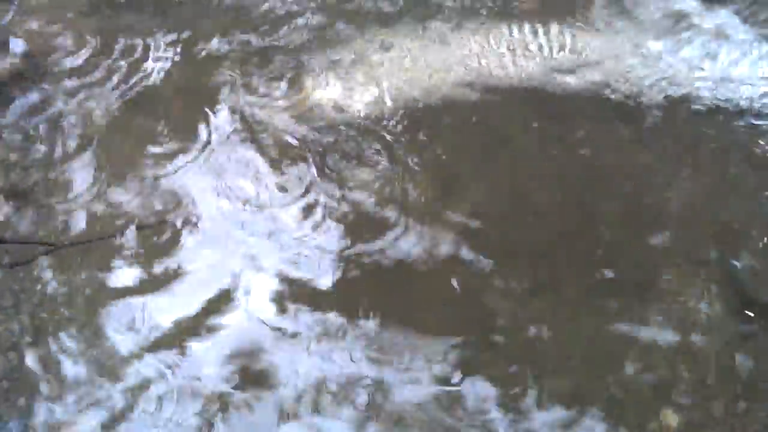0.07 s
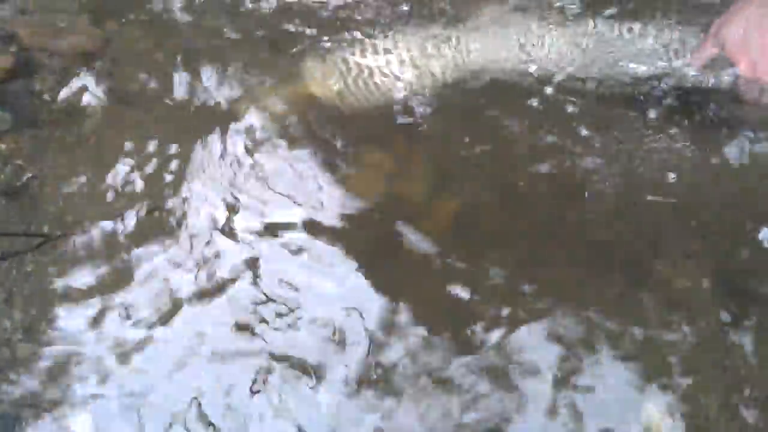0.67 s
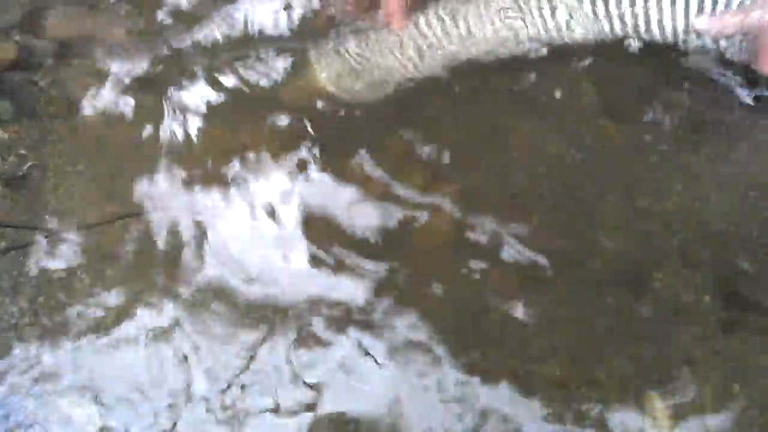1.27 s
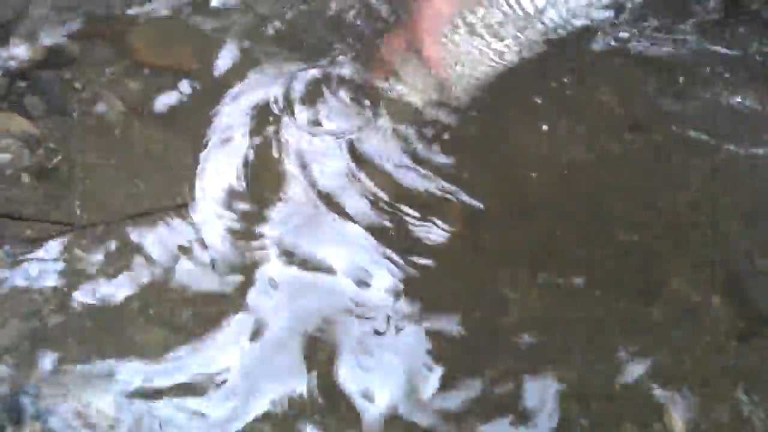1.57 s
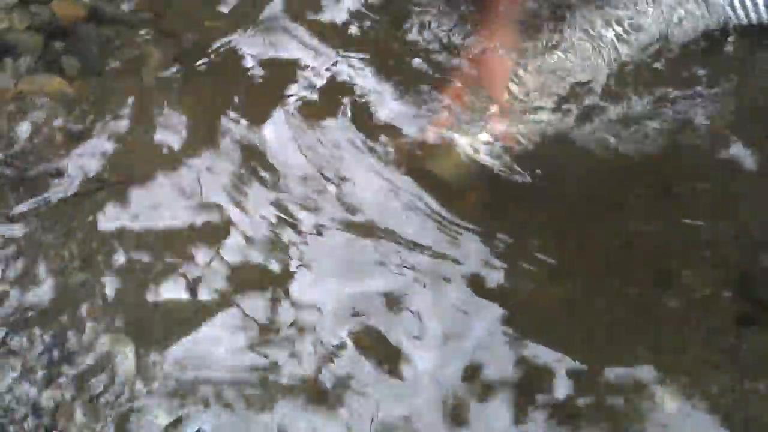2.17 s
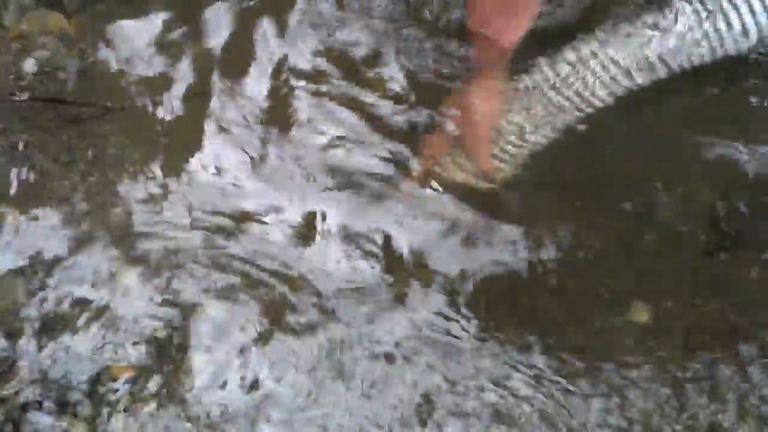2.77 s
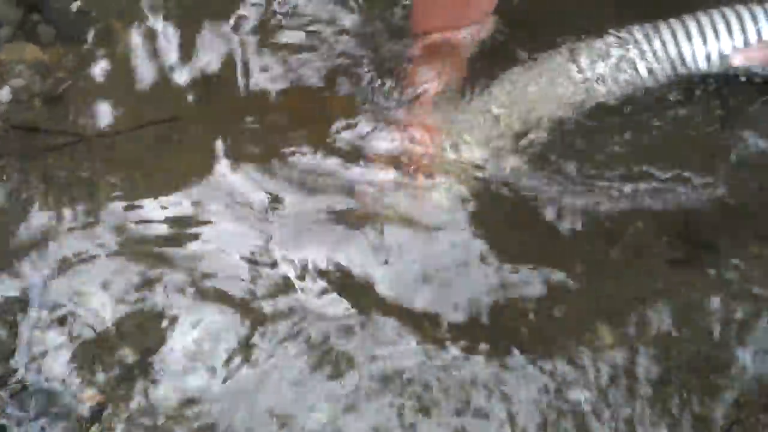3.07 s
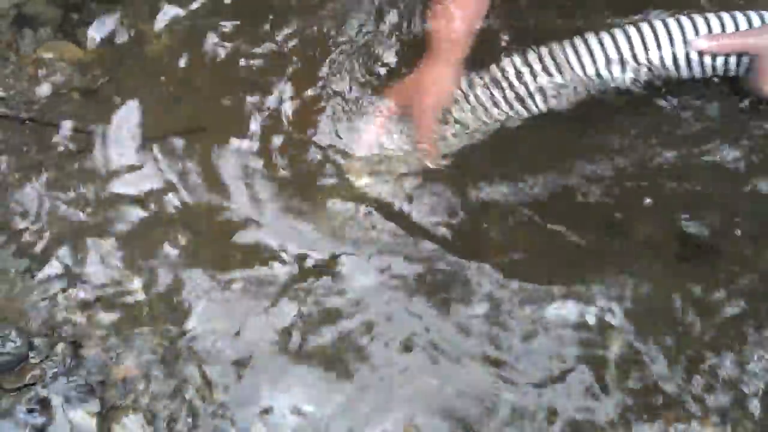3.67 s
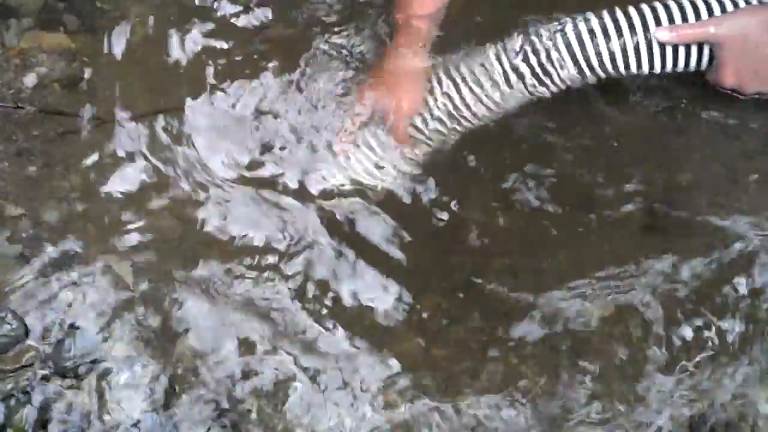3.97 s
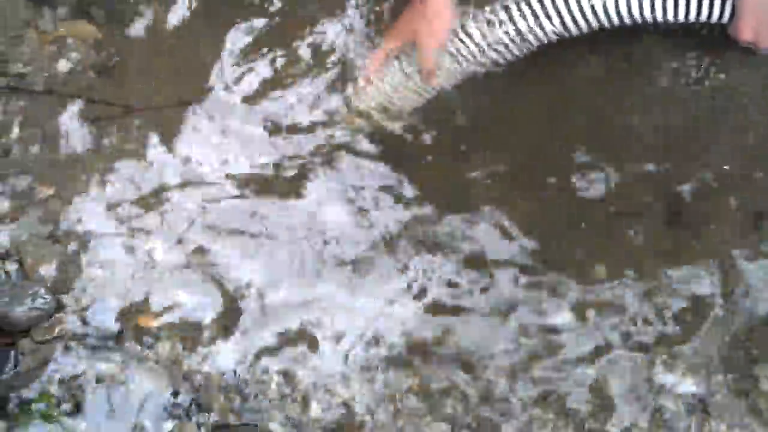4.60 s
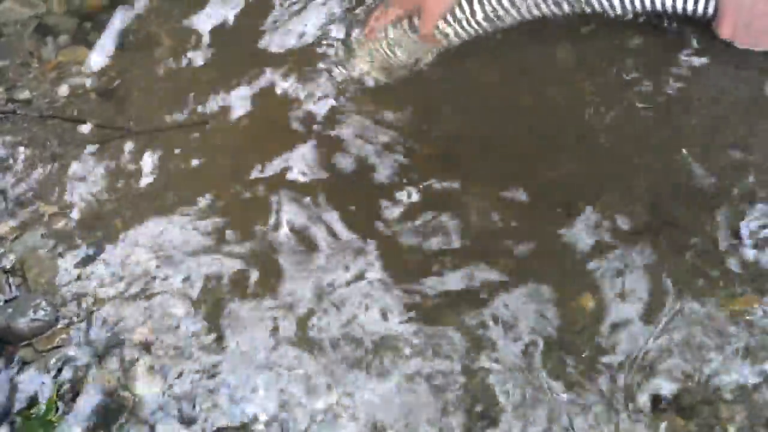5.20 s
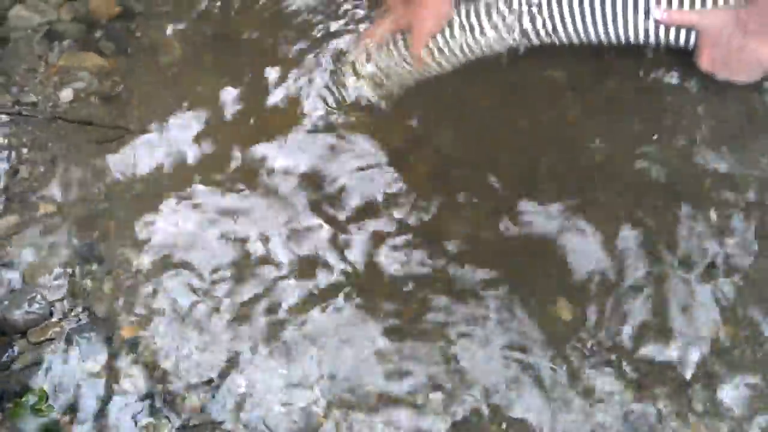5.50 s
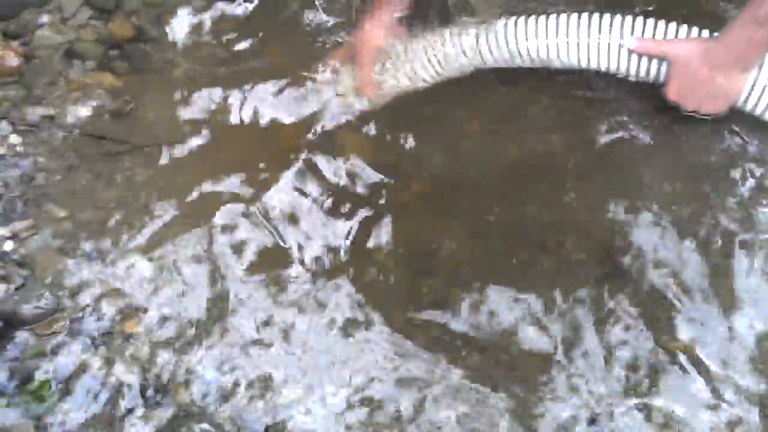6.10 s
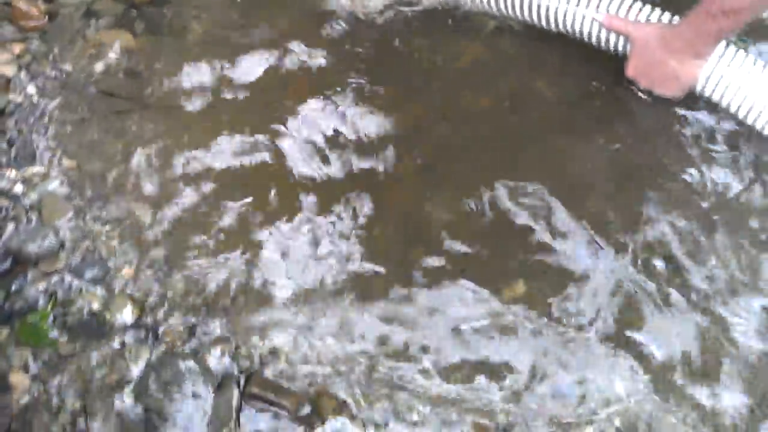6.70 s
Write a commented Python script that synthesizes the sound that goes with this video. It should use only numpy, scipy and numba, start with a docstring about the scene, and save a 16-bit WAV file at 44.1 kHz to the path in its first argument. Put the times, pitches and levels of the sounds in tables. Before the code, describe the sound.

A small engine drones steadily beside a babbling creek, while a suction hose in the shallows gulps, plops and splashes.

```python
"""A small dredge engine drones on a creek bank: its periodic firing gives a harmonic series over a
throbbing clatter. The creek babbles and fizzes by the resonance of countless air bubbles. A suction hose
worked through the shallows gulps air, plops, splashes and spits, and its nozzle knocks on the bed.
A widened stereo microphone drifts between two spots and ducks its gain after the loud moments."""
import sys
import numpy as np
from scipy import signal
from scipy.fft import rfft, irfft, next_fast_len
from scipy.io import wavfile
from scipy.ndimage import uniform_filter1d, map_coordinates
from numba import njit

SR = 44100
rng = np.random.default_rng(int(sys.argv[2]) if len(sys.argv) > 2 else 0)


def wrap_up_sound(samples):
    """Save the sound to the file named by the first command line argument, as 16-bit audio."""
    columns = np.atleast_2d(samples).T
    # keep every value between -1 and 1, then stretch to whole-number steps
    tamed = np.clip(columns, -1, 1)
    steps = np.round(tamed * 32767).astype(np.int16)
    wavfile.write(sys.argv[1], SR, steps)


N = 302085
TIME = np.arange(N) / SR


def amp(db):
    """Amplitude ratio of a level in decibels."""
    return 10 ** (np.asarray(db) / 20)


def unit(x):
    """Normalisation to rms 1."""
    return x / np.sqrt(np.mean(x ** 2) + 1e-20)


def along(points, hz):
    """Interpolation of (Hz, value) points on a logarithmic frequency axis."""
    freqs, values = np.transpose(points)
    return np.interp(np.log(hz + 1), np.log(freqs + 1), values)


def wobble(rate):
    """Slow random modulation: a spline through rate knots a second."""
    knots = rng.standard_normal(int(N * rate / SR) + 4)
    return map_coordinates(knots, [TIME * rate], mode="nearest")


def filtered(x, response):
    """Linear filtering: the spectrum is multiplied by a frequency response."""
    size = next_fast_len(N + 8192)
    return irfft(rfft(x, size) * response(np.fft.rfftfreq(size, 1 / SR)), size)[..., :N]


def passed(x, kind, hz):
    """Second-order filtering with a flat passband."""
    return signal.sosfilt(signal.butter(2, hz, kind, fs=SR, output="sos"), x)


def add(track, start_s, sound):
    """Superposition of a short sound on a track."""
    part = track[..., round(start_s * SR):][..., :sound.shape[-1]]
    part += sound[..., :part.shape[-1]]


def drift(start_s=1.9, end_s=6.3):
    """Accelerating motion: the microphone's share of the way from the first spot to the second."""
    return np.clip((TIME - start_s) / (end_s - start_s), 0, 1) ** 2.4


# Each row: frequency in Hz, correlation of the two microphone ports.
COHERENCE = [(60, 0.7), (150, 0.84), (400, 0.88), (800, 0.65), (1400, 0), (2200, 0.16), (5000, 0.068),
             (12000, 0)]

def at_ports(pair, spectrum):
    """Spatial coherence: two close ports hear long waves alike, short ones independently; rms 1."""
    def response(hz):
        angle = np.arccos(np.clip(along(COHERENCE, hz), -1, 1)) / 2
        return amp(along(spectrum, hz)) * [np.cos(angle), np.sin(angle)]
    mid, side = filtered(pair, response)
    return unit(np.array([mid + side, mid - side]))


def rumble(level_db=-75, lumps_db=4.5):
    """Antiphase noise: a faint, uneven rumble, opposite in the two channels."""
    low = unit(filtered(rng.standard_normal(N), lambda hz: 1 / (1 + (hz / 90) ** 4)))
    return amp(level_db + lumps_db * wobble(9)) * low * np.array([[1], [-1]])


def bubble(t, hz, t60, swell_s, rise=0.068):
    """Bubble resonance: trapped air rings, its pitch rising by the share rise per t60 as it surfaces."""
    envelope = amp(-60 * t / t60) * (1 - np.exp(-t / swell_s))
    return envelope * np.sin(2 * np.pi * hz * t * (1 + rise * t / t60 / 2))


def swarm(low_hz, high_hz, cycles, spread_db, count, samples):
    """Incoherent summation: bubbles ring at random moments in two independent streams; rms 1."""
    when, pitch, strength, stream = rng.random((count, 4)).T[..., None]
    hz = low_hz * (high_hz / low_hz) ** pitch
    gain = amp(-spread_db * np.log(1 - .98 * strength)) * np.sqrt(hz)
    rings = gain * bubble(np.arange(samples) / SR, hz, t60=cycles / hz, swell_s=.5 / hz, rise=0.17)
    place = (when * (N - samples)).astype(int) + np.arange(samples) + N * (stream > .5)
    return unit(np.bincount(place.ravel(), rings.ravel(), 2 * N).reshape(2, N))


def patchy_noise(depth_db):
    """Random modulation in time and frequency: two white noises share patches of gain."""
    spectra = signal.stft(rng.standard_normal((2, N)), nperseg=512)[2]
    patches = rng.standard_normal(spectra.shape[1:])
    for axis in (0, 1):
        patches = uniform_filter1d(patches, size=7, axis=axis)
    return unit(signal.istft(spectra * amp(depth_db * unit(patches)), nperseg=512)[1][:, :N])


# Spectra of large and of tiny bubbles. Each row: frequency in Hz, relative density in dB.
BABBLE_SPECTRUM = [(100, -14.5), (350, 5), (590, 3), (700, 1.5), (1000, 0), (1400, -2.5), (2000, -6),
                   (2700, -12.5), (5000, -24.5), (12000, -59)]
FIZZ_SPECTRUM = [(500, -7), (1500, -1.5), (2300, 7), (3300, 2.5), (4300, 2), (6500, 0.5), (8000, -1),
                 (10000, -6), (13000, -15), (15500, -19)]
# A hand stirs the shallows. Each row: time of the peak in seconds, swell of the babble in dB.
STIRS = [(.7, 1), (1.55, 2.5), (2.84, 3.8), (3.1, 1), (3.33, 3), (3.62, 2), (4.25, 1), (5.4, 1.5)]

def creek(babble_db=-34.5, fizz_db=-38.5, stir_s=0.1):
    """Resonance falls with size: large bubbles babble, tiny ones fizz, louder as the microphone nears."""
    nearness = drift()
    stir_db = sum(db * np.exp(-((TIME - peak) / stir_s) ** 2) for peak, db in STIRS)
    surge_db = -0.24 * wobble(5.2)
    large = swarm(649, 2440, cycles=14, spread_db=4, count=1800, samples=1000)
    tiny = swarm(2260, 13400, cycles=18, spread_db=2.5, count=9000, samples=200)
    babble = at_ports(patchy_noise(depth_db=1.47) + 0.11 * large, BABBLE_SPECTRUM)
    fizz = at_ports(patchy_noise(depth_db=1.4) + 0.24 * tiny, FIZZ_SPECTRUM)
    babble *= amp(babble_db + 2 * nearness + stir_db + surge_db)
    fizz *= amp(fizz_db + 0.45 * nearness + 0.07 * stir_db + surge_db + 0.5 * wobble(12))
    return babble + fizz


# Low glugs and high plinks. Each row: start in seconds, level in dB, pitch in Hz.
BUBBLES = [(.7235, -17, 345), (.769, -21, 438), (.804, -17, 437), (4.491, -14, 315), (4.511, -17, 323),
           (4.535, -17, 530), (4.566, -27, 900), (1.191, -21, 2060), (1.193, -29, 3960), (1.558, -23, 1200),
           (1.57, -24, 1800), (1.584, -24, 1360), (1.703, -18.5, 2940), (2.249, -20.5, 3850),
           (2.53, -16, 2110), (2.8884, -15.5, 2030), (3.144, -25, 1520), (3.203, -21, 2020),
           (3.7295, -21, 1000), (4.974, -25, 2130), (5.441, -23, 1300), (6.064, -26, 1490)]

def single_bubbles(t, t60_at_1khz=0.025):
    """Damping grows with frequency: the smaller a bubble, the sooner its ring dies."""
    track = np.zeros(N)
    for start, db, hz in BUBBLES:
        t60 = t60_at_1khz * (hz / 1000) ** -0.35
        add(track, start, amp(db) * bubble(t, hz, t60, swell_s=1 / hz))
    return track


# Spits of spray, and at 4.528 s the click of the nozzle striking the bed. Each row: start in seconds, level in
# dB, length in seconds.
SPITS = [(1.207, -31, 0.0085), (1.53, -38, 0.079), (2.067, -28, 0.01), (2.083, -22, 0.047),
         (2.12, -19, 0.0083), (2.822, -31, 0.0049), (3.173, -34, 0.005), (3.437, -30.5, 0.0056),
         (3.73, -37, 0.0031), (4.44, -41, 0.05), (4.528, -33, 0.0038), (5.14, -32, 0.0034),
         (5.486, -35, 0.021), (5.746, -28.5, 0.0051), (5.773, -32, 0.0096), (5.92, -53, 0.06),
         (6.255, -30, 0.0068), (6.727, -34, 0.041)]
# Spectrum of the droplets. Each row: frequency in Hz, relative density in dB.
DROPLET_SPECTRUM = [(500, -10), (2000, 3), (4000, 2.5), (8000, 2.5), (12000, -10.5), (15500, -14)]

def spray(t, fleck_count=14, attack_s=0.00076):
    """Brief bursts are broadband: spits, a tick as each single bubble is trapped, faint random flecks."""
    ticks = [(start, db - 14.5, 0.0022) for start, db, _ in BUBBLES]
    flecks = [(when * N / SR, -41 + 6 * strength, 0.006)
              for when, strength in rng.random((fleck_count, 2))]
    envelope = np.zeros(N)
    for start, db, length in [*SPITS, *ticks, *flecks]:
        add(envelope, start, amp(db) * (1 - np.exp(-t / attack_s)) * np.exp(-(t / length) ** 2))
    return envelope * at_ports(rng.laplace(size=(2, N)), DROPLET_SPECTRUM)


# Splashes round hand and hose. Each row: start in seconds, level in dB, length in seconds, pitch in Hz.
SPLASHES = [(0.248, -30, 0.007, 845), (1.193, -31.5, 0.0096, 4000), (1.207, -35, 0.0056, 4600),
            (1.54, -32, 0.0059, 4300), (2.25, -38, 0.0073, 4370), (2.699, -34, 0.0085, 1890),
            (2.786, -34.5, 0.0046, 1690), (2.891, -28, 0.0046, 1680), (2.977, -34, 0.0048, 1700),
            (3.174, -28, 0.0043, 1710), (3.203, -44, 0.0061, 1400), (3.729, -31, 0.0041, 1890),
            (5.066, -29, 0.00513, 1400), (5.336, -34, 0.026, 937), (5.487, -33, 0.0032, 4600),
            (6.088, -33.5, 0.013, 1500), (6.62, -31.5, 0.0094, 990), (6.685, -31.5, 0.007, 1800)]

def splashes(t, count=14, scatter_octaves=0.55, cycles=9.4):
    """Air entrainment: each wavelet breaks into a cluster of short-lived bubbles, densest at first."""
    track = np.zeros(N)
    for start, db, length, middle_hz in SPLASHES:
        when, strength = rng.random((2, count, 1))
        hz = middle_hz * 2 ** (scatter_octaves * np.clip(rng.standard_normal((count, 1)), -2, 2))
        age = np.maximum(t - length * when ** 2, 0)
        rings = bubble(age, hz, t60=cycles / hz, swell_s=.2 / hz)
        cluster = np.sum(strength * np.sqrt(hz) * rings, axis=0)
        rms = np.sqrt(np.sum(cluster ** 2) / (length * SR))
        add(track, start, amp(db) * cluster / rms)
    return track


def gulp(t, start_s=0.7108, peak_db=-19.5, from_hz=915, octaves_per_s=26, swell_s=0.01, t60=0.038):
    """A gliding resonance: air gulped by the nozzle swells, shoots up an octave and breaks off."""
    hz = from_hz * 2 ** np.minimum(octaves_per_s * t, 1)
    shape_db = np.minimum(10 * (t / swell_s - 1), -60 * (t - swell_s) / t60)
    track = np.zeros(N)
    add(track, start_s, amp(peak_db + shape_db) * np.sin(2 * np.pi * np.cumsum(hz) / SR))
    return track


# Rings of the cavity. Each row: delay in seconds, level in dB, pitch in Hz, t60 in seconds.
CAVITY_RINGS = [(0, -1.5, 830, .0065), (0.0021, -4.5, 935, 0.019), (0.0001, -13, 1300, 0.01),
                (0, -14, 720, 0.018), (0.0021, -23, 1750, 0.012), (0.0105, -17, 950, 0.015)]

def plop(t, start_s=2.0797):
    """Cavity collapse: the hose mouth slaps the surface, and the hollow rings as it closes."""
    track = np.zeros(N)
    for delay, db, hz, t60 in CAVITY_RINGS:
        add(track, start_s + delay, amp(db) * bubble(t, hz, t60, swell_s=0.00026, rise=0.02))
    return track


# Modes of the nozzle. Each row: frequency in Hz, level in dB, t60 in seconds.
NOZZLE_MODES = [(322.5, -10.5, 0.098), (533, -17.5, 0.18), (700, -13.5, 0.042), (966, -28, 0.067),
                (1100, -26, 0.037), (1630, -26, 0.038)]
# The two contacts of one knock. Each row: start in seconds, gain in dB.
CONTACTS = [(4.497, -10), (4.528, -0.5)]

def knock(t, gravel_db=-24, gravel_t60=0.14):
    """Impact excites damped modes: the nozzle strikes the bed, and shifting gravel adds a dull tail."""
    modes = sum(amp(db - 60 * t / t60) * np.sin(2 * np.pi * hz * t) for hz, db, t60 in NOZZLE_MODES)
    track = np.zeros(N)
    for start, db in CONTACTS:
        gravel = unit(passed(rng.standard_normal(len(t)), "band", [250, 900]))
        add(track, start, amp(db) * (amp(gravel_db - 60 * t / gravel_t60) * gravel - modes))
    return track


def hose(left_db=-2):
    """Small sources radiate little bass: the rings round the hose lose their lows; spray lies on top."""
    t = np.arange(SR // 4) / SR  # time within one event
    rings = single_bubbles(t) + splashes(t) + gulp(t) + plop(t) + knock(t)
    return passed(rings, "high", 220) * amp([[left_db], [0]]) + spray(t)


# Spectrum of engine and pump noise. Each row: frequency in Hz, relative density in dB.
CLATTER_SPECTRUM = [(20, -20), (60, -20), (110, -8), (240, -6), (335, 9.5), (420, 0), (510, 9.5), (590, -9),
                    (665, -1), (780, -9.5), (880, -4), (1300, -33), (2100, -12), (3000, -14), (8000, -48)]
# Its change of colour at the second spot. Each row: frequency in Hz, gain in dB.
SECOND_SPOT_COLOUR = [(180, -1), (260, 5.5), (350, -6), (500, -6), (660, 6), (1200, -4), (2200, -10)]

def clatter(firings, level_db=-37, throb_depth=0.25, buzz_above_hz=600):
    """Amplitude modulation: engine and pump noise throbs three times a firing; part of it repeats."""
    period = round(SR / 28.385)  # samples in a mean firing cycle
    repeating = rng.standard_normal((2, period))[:, (firings % 1 * period).astype(int) % period]
    buzz = filtered(repeating, lambda hz: hz > buzz_above_hz)
    throb = 1 + throb_depth * np.cos(2 * np.pi * 3 * firings)
    first = at_ports(throb * (rng.standard_normal((2, N)) + 0.44 * buzz), CLATTER_SPECTRUM)
    second = filtered(first, lambda hz: amp(along(SECOND_SPOT_COLOUR, hz)))
    onward = drift()
    return amp(level_db) * ((1 - onward) * first + onward * second)


# Exhaust tones. Each row: multiple of the firing rate, then for each of the two spots
# left level in dB, right level in dB, phase lead of the left in radians.
HARMONICS = [(2, -48, -47, 3.1, -48, -48, 3.1), (3, -52, -54, -3.0, -53, -55, -3.0),
             (4, -53, -62, -1.8, -52, -62, -2.0), (5, -32, -36, -0.8, -28, -34, -1.3),
             (6, -39, -40, -0.8, -36, -38, -1.5), (7, -53, -50, -1.5, -53, -47, -2.2),
             (8, -43, -35, -1.7, -42, -38, -2.0), (9, -38, -33, 3.3, -31.5, -35.5, 1.0),
             (10, -63, -44, 0.4, -54, -49, -0.2), (11, -52, -40, -0.5, -59, -42, -2.4),
             (12, -34.7, -38.7, -0.3, -36.5, -34.5, -0.6), (13, -56, -57, -0.6, -59, -54, -0.3),
             (14, -39, -33, -0.8, -40, -38, -1.3), (15, -44, -39, -1.0, -46, -42, -2.5),
             (16, -49, -47, -1.1, -60, -58, 0.5), (17, -40, -34, -1.0, -41, -36.5, -4.7),
             (18, -49, -43, -1.0, -56, -48, -5.4), (23, -50, -50, 0, -49, -49, 0),
             (26, -52, -52, 0, -52, -52, 0)]

def exhaust(firings, smear_cycles=0.12, flutter_db=0.5, waver_rad=0.028):
    """Periodic pulses form a harmonic series; dispersion in the pipe smears each pop into a putter."""
    onward = drift()
    drone = np.zeros((2, N))
    for order, *spots in HARMONICS:
        first, second = np.reshape(spots, (2, -1))
        left_db, right_db, lead = np.outer(first, 1 - onward) + np.outer(second, onward)
        phase = 2 * np.pi * order * (firings - smear_cycles * order / 2) + waver_rad * wobble(11)
        peak = np.sqrt(2) * amp(np.array([left_db, right_db]) + flutter_db * wobble(6))
        drone += peak * np.sin([phase + lead / 2, phase - lead / 2])
    return drone


def widened(ports, from_hz=350, delay_s=16 / SR):
    """Inverted crossfeed widens the image: above the bass, each side subtracts the other, delayed."""
    feed = lambda hz: hz ** 2 / (hz ** 2 + from_hz ** 2) * np.exp(-2j * np.pi * hz * delay_s)
    return ports - filtered(ports[::-1], feed)


# Loudness of the engine. Each row: time in seconds, gain in dB.
ENGINE_GAIN = [(0, -2.5), (.7, 0.5), (1.4, 0), (3, -0.5), (4.6, 0.6), (6.85, 0)]
# Balance of water and clatter. Each row: time in seconds, lean to the right from 0 to 1.
RIGHT_LEAN = [(1.4, 0.2), (4.4, 0.24)]

def scene(firing_hz=28.385, low_cut_hz=70):
    """Superposition at the microphone: the exhaust drone, with water and clatter a little to the right."""
    engine_gain = amp(np.interp(TIME, *np.transpose(ENGINE_GAIN)))
    lean = np.interp(TIME, *np.transpose(RIGHT_LEAN))
    firings = np.cumsum(firing_hz * (1 + 0.000755 * wobble(4.03))) / SR  # cycles elapsed
    rush = widened(engine_gain * clatter(firings) + creek() + hose())
    rush = passed(rush, "high", low_cut_hz)
    return engine_gain * exhaust(firings) + rush + np.array([-lean, lean]) * rush.mean(axis=0)


@njit
def held(demand, hold_samples, decay):
    """Peak hold: each new high is followed at once, held, then left to sink exponentially."""
    out, level, wait = np.zeros(len(demand)), 0., 0.
    for i in range(len(demand)):
        wait -= 1
        if demand[i] > level:
            level, wait = demand[i], hold_samples
        elif wait < 0:
            level *= decay
        out[i] = level
    return out


def smoothed(x, seconds):
    """Exponential averaging with one time constant."""
    step = 1 / (seconds * SR)
    return signal.lfilter([step], [1, step - 1], x)


def gain_control(x, threshold_db=-20, slope=0.89, attack_s=0.0061, hold_s=0.34, release_s=0.94):
    """Compression: power above a threshold turns the gain down; it waits, then creeps back."""
    power = smoothed(np.mean(x ** 2, axis=0), seconds=0.0091)
    over_db = np.maximum(10 * np.log10(power + 1e-12) - threshold_db, 0)
    cut_db = held(slope * over_db, hold_s * SR, np.exp(-1 / (release_s * SR)))
    return x * amp(-smoothed(cut_db, attack_s))


def record(dry, ceiling=0.92, top_hz=15750):
    """Compression, soft saturation and a band limit act in turn on the scene and the rumble."""
    ducked = gain_control(dry + rumble())
    saturated = ducked / (1 + (ducked / ceiling) ** 6) ** (1 / 6)
    return filtered(saturated, lambda hz: hz < top_hz)


dry = scene()
out = record(dry)
wrap_up_sound(out)
```